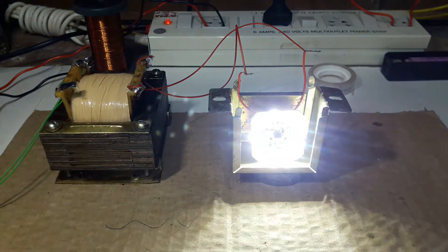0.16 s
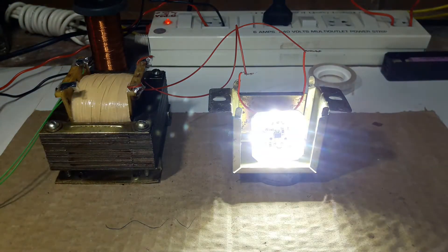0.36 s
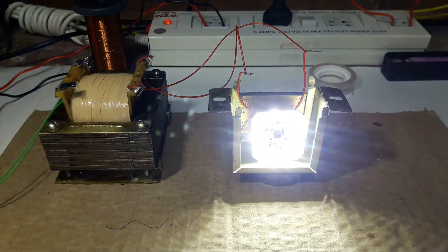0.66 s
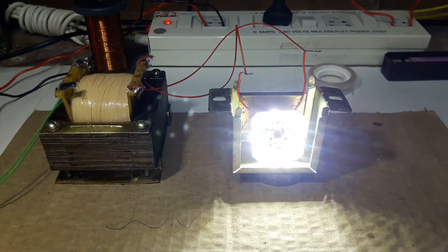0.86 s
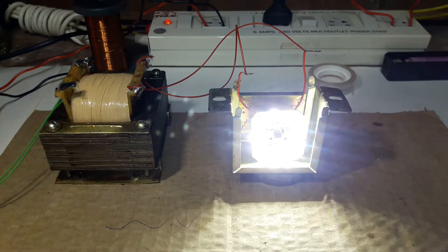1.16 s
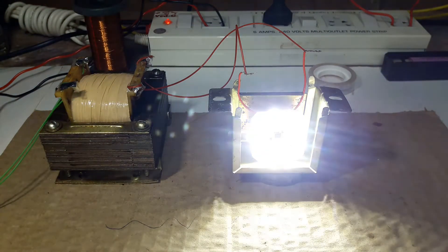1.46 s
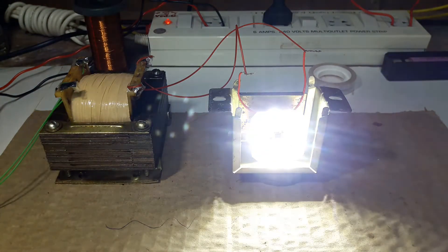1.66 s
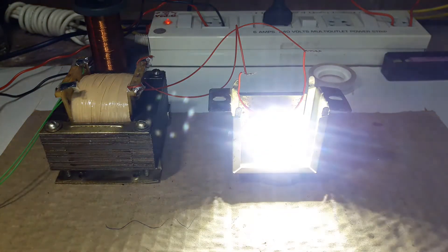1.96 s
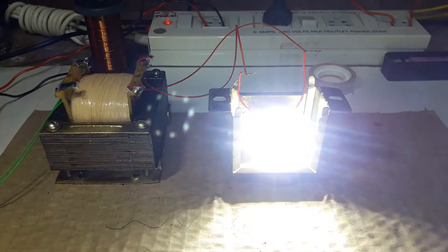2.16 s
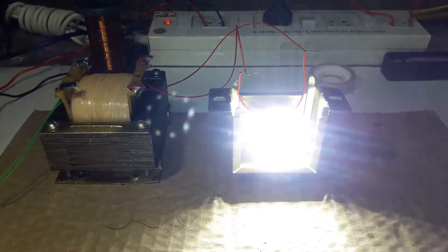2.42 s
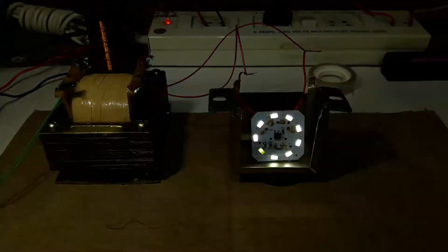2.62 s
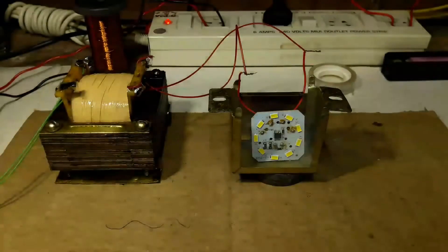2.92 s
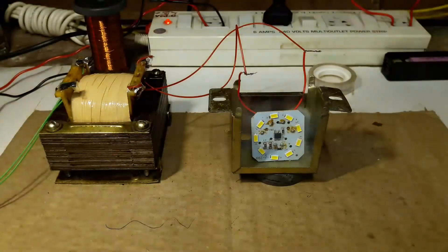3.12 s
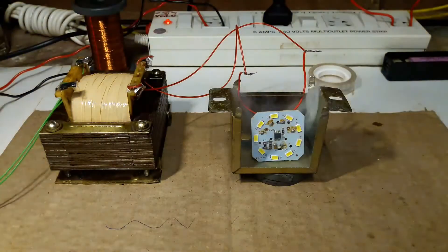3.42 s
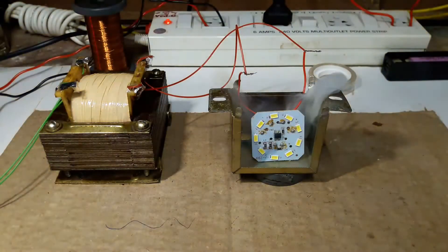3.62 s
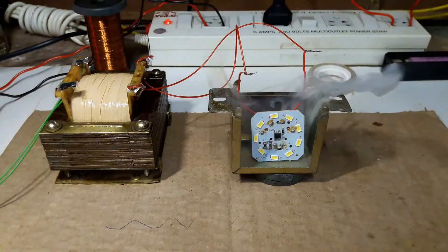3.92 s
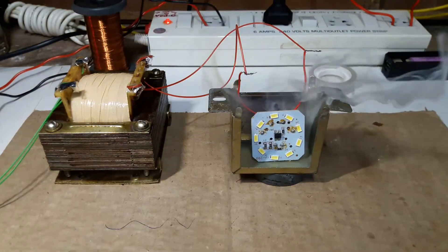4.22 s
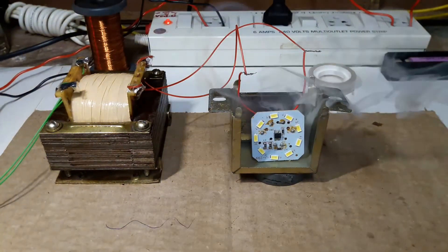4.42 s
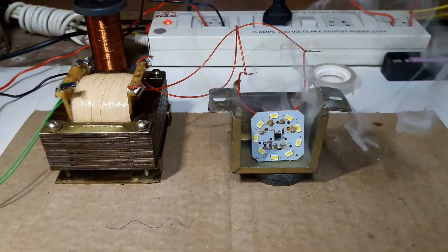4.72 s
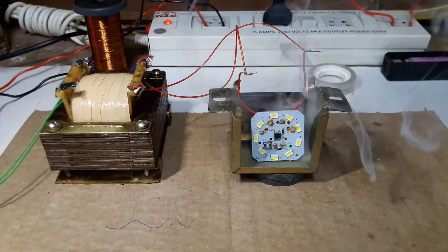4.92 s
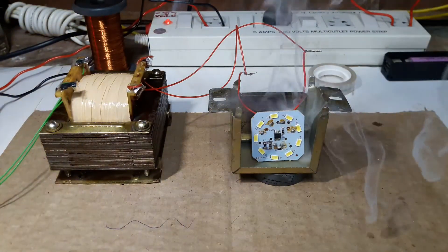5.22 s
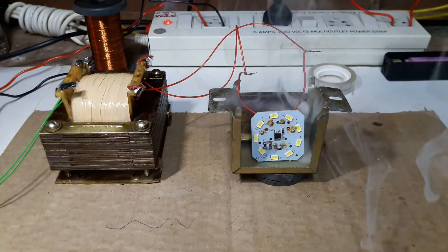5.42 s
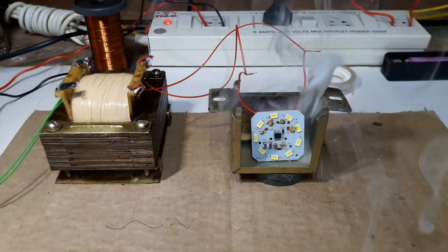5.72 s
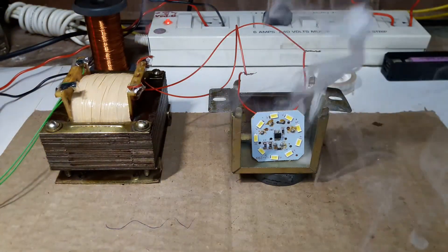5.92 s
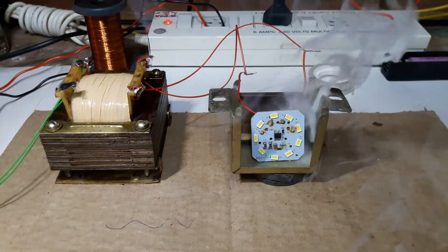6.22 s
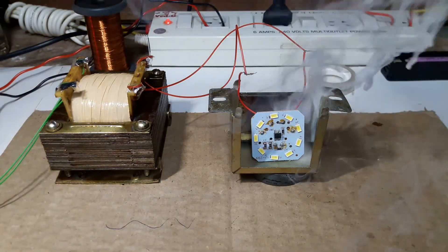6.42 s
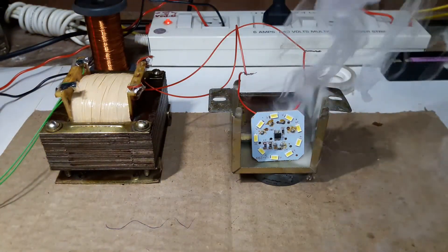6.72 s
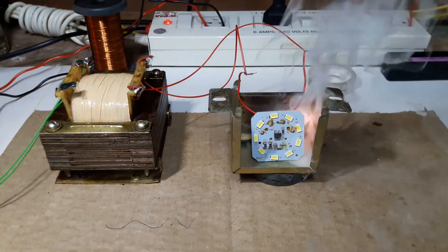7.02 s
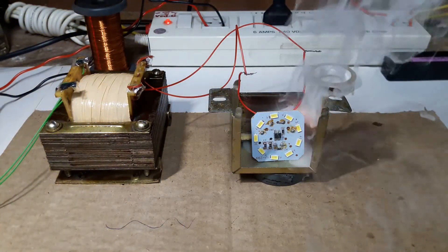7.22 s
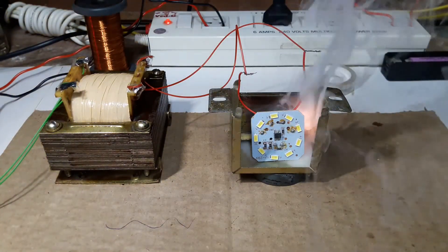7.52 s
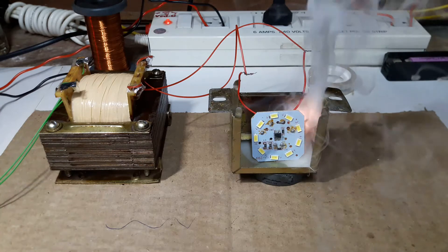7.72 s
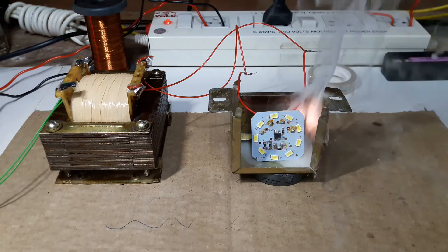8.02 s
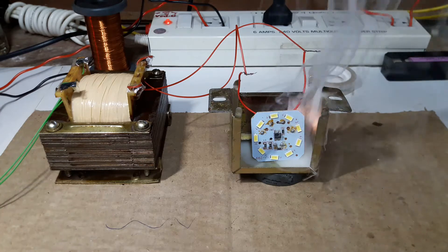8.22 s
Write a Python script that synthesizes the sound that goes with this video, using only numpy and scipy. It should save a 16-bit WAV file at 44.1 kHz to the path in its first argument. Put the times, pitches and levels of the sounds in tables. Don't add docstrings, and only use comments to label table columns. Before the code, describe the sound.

A faint background sinks almost to silence, then opens at 0.3 s into quiet room noise and steady transformer hum, with tiny electrical ticks. From about 1 s a lamp board's arc grows into a bright, rapid mains-rate sputter, sharp ticks at 1.3 to 1.9 s, strongest near 2.1 s, then thinning into a higher whistle. Cracks snap at 2.77 s, and at 2.9 s a huge, dry bang overloads the microphone, ringing briefly in the small room. The background ducks, and weak spitting resumes, recovering by 4.5 s. Hard snaps and fierce fizz cluster from 4.3 to 5.2 s with a thin gas whistle. A fuller buzzing hiss swells from 5.5 to 7.3 s, dips, then returns with sharp spits at 8.1 and 8.3 s. Faint soft hoots sound outside, notably near 2.6, 4.1 and 7.5 s. It ends still fizzing at 8.4 s.

```python
import sys
import numpy as np
from scipy import signal
from scipy.fft import rfft, irfft
from scipy.io import wavfile
from scipy.ndimage import uniform_filter1d

SR = 44100
rng = np.random.default_rng(int(sys.argv[2]) if len(sys.argv) > 2 else 0)


def bounce(signal):
    frames = np.transpose(np.atleast_2d(signal))
    limited = np.clip(frames, -1, 1)
    pcm = np.round(limited * 32767).astype(np.int16)
    wavfile.write(sys.argv[1], SR, pcm)


def undo_db(level):
    steps = np.asarray(level, float) / 20
    return 10 ** steps


N = 368676


def rms_one(x):
    return x / np.sqrt(np.mean(x ** 2) + 1e-20)


def in_time(rows):
    s, *columns = np.transpose(rows)
    return [np.interp(np.arange(N) / SR, s, column) for column in columns]


def at_hz(points, hz):
    points_hz, points_db = np.transpose(points)
    return np.interp(np.log(hz), np.log(points_hz), points_db)


def colour(x, spectrum, rings=()):
    size = 4096
    hz = np.arange(size // 2 + 1) * SR / size + 1
    db = at_hz(spectrum, hz)
    for ring_hz, width_hz, top_db in rings:
        db = db + top_db / (1 + (2 * (hz - ring_hz) / width_hz) ** 2)
    cepstrum = irfft(np.log(undo_db(db)))
    cepstrum[1:size // 2] *= 2
    response = irfft(np.exp(rfft(cepstrum[:size // 2], size)))[:size // 2]
    return signal.fftconvolve(x, response / np.linalg.norm(response))[:len(x)]


def crackle(per_s, spread_db):
    sizes = undo_db(spread_db * np.minimum(rng.exponential(1, N), 4))
    signs = rng.choice([-1, 1], N)
    happens = rng.random(N) < per_s / SR
    return rms_one(sizes * signs * happens)


MAINS_HZ, FIRST_STRIKE_S = 49.986, .0056
BURN_S, SAG_S, RISE_S = .0042, .03, .0009
PUFF_DB = 11
BANG_S = 2.9
# [t/s, peak level/dB, extra body/dB]
SPARKS = [(2.7683, -29, -12), (3.0268, -28, -1), (3.0865, -26.5, -0.5), (3.2766, -31.5, -2.5),
          (3.4067, -30.5, -4.5), (3.706, -28.5, -1.5), (3.8675, -27.5, -1.5), (4.1065, -27, 1),
          (4.2485, -25, -1), (4.3271, -22.5, 0.5), (4.3464, -20.5, -2.5), (4.428, -18.5, -4.5),
          (4.4467, -18.5, -3), (4.4674, -19, -2), (4.5272, -17, 1.5), (4.5665, -16.5, -4),
          (4.587, -15, -1.5), (4.6072, -14, -3.5), (4.7477, -24, 0), (4.807, -26.5, 1), (4.9072, -22.5, -6),
          (4.9275, -19, -3), (4.9673, -16.5, -5.5), (4.987, -22.5, -2), (5.1072, -17.5, -5),
          (5.167, -24.5, -9), (6.3694, -38, 5), (6.5064, -34.5, 1), (8.1287, -27.5, -1),
          (8.3285, -24, -4.5)]
# [t/s, peak level/dB, extra body/dB]
TICKS = [(0.3042, -54, 0), (0.3361, -52, 2), (0.417, -49, 0), (0.5965, -58, 0), (0.7292, -38, -9),
         (1.285, -28, -1), (1.346, -28.5, 1.5), (1.506, -23.5, -3), (1.646, -25, -3), (1.736, -26, -5),
         (1.763, -25, -1), (1.776, -22.5, 2), (1.7858, -23, -5), (1.8154, -26, -4), (1.8663, -26, -2),
         (2.8993, -7, 1.5), (2.9264, -18, -4), (2.9464, -18, -4), (2.9674, -29, 0), (3.0071, -28.5, 0)]
# [t/s, length/s, loss/dB]
LULLS = [(1.268, .03, 6), (3.06, 0.027, -4), (3.35, 0.11, 5), (3.974, 0.081, 3), (4.951, .03, 5),
         (5.015, 0.025, 0.5), (5.45, 0.076, 3), (5.79, 0.12, 4.5), (6.14, 0.18, 3.5), (7.386, 0.061, 2),
         (7.998, 0.12, 3.5), (8.218, 0.026, 2)]


def arc(table, voice, spectra, rings, uneven_db, own_db, leak_db, crest_db):
    t = np.arange(N) / SR
    begin_s, end_s = table[0][0], table[-1][0]
    heat_db, shift_db, weak_db = uniform_filter1d(in_time(table), size=SR // 25)
    for s, length, loss_db in LULLS:
        heat_db = heat_db - loss_db * np.exp(-(2 * (t - s) / length) ** 2)
    levels_db = [heat_db + offset_db + share * shift_db + drift_db * (t - begin_s)
                 for offset_db, share, drift_db in voice]

    lead_s = .003
    half_cycles = (t - FIRST_STRIKE_S + lead_s) * 2 * MAINS_HZ
    which = np.maximum(half_cycles, 0).astype(int)
    strength, late_s, *own = np.clip(rng.standard_normal((6, which[-1] + 1)), -1.7, 1.7)
    late_s = 0.0006 * late_s
    own = own_db * np.array(own)
    gain = undo_db(uneven_db * strength)[which] * undo_db(weak_db * (which % 2))
    usual = np.sqrt(uniform_filter1d(gain ** 2 * BURN_S * MAINS_HZ + undo_db(leak_db) ** 2, size=SR // 8))
    gain = gain / usual

    bright = np.hypot(undo_db(levels_db[0]), undo_db(levels_db[1]))
    for s, peak_db, body_db in SPARKS + TICKS:
        k = which[int(s * SR)]
        late_s[k] = s - RISE_S / 2 - FIRST_STRIKE_S - k / (2 * MAINS_HZ)
        own[:, k] = 0, 0, body_db, body_db
        gain[which == k] = undo_db(peak_db - crest_db) / bright[which == k]

    since_s = half_cycles % 1 / (2 * MAINS_HZ) - lead_s - late_s[which]
    flame = np.clip(since_s / RISE_S, 0, 1) * np.exp(-since_s / SAG_S - (since_s / BURN_S) ** 6)
    fizz = crackle(30000, 1.1)

    cycle = half_cycles % 2
    puff_db = PUFF_DB * np.clip(-weak_db / 8.0, 0, 1) * (.5 - cycle / 2 - (cycle < .3))
    hiss = undo_db(leak_db + puff_db) / usual * rng.standard_normal(N)

    near_bang = abs(t - BANG_S - .005) <= .012
    live = (t > begin_s) & (t < end_s + .003) & ~near_bang
    drive = live * (gain * flame * fizz + hiss)
    out = 0
    for level_db, own_k, spectrum in zip(levels_db, own, spectra):
        out = out + colour(drive * undo_db(level_db + own_k[which]), spectrum, rings)
    return out


# [t/s, strength level/dB, whistle climb/dB, weak half-cycle level/dB]
LIT = [
    (0.29, -106, 0, -3),
    (0.93, -91, -6, -3),
    (1.05, -74, -2, -12),
    (1.24, -65, -3, -12),
    (1.32, -55.5, -3, -8),
    (1.76, -52.5, 0, 6),
    (2.08, -48.5, 1.5, -1),
    (2.2, -52, 8, -5),
    (2.49, -66, 13, -1),
    (2.755, -72, -1, -4),
]
# [offset/dB, share of the climb, drift/(dB per s)]
LIT_VOICE = [
    (-1.5, 1.12, 0),
    (1.5, -0.72, 0.5),
    (-22, 0.63, 3),
    (-24.5, 1.05, 0.1),
]
# [f/Hz, level/dB per Hz]
TOP_LIT = [(8000, -32), (13600, -3.5), (14800, -3), (15700, -5)]
UPPER_LIT = [(4820, -68), (8200, -30), (10200, -14), (11000, -16), (11300, -6.5), (12300, 0.5), (12800, 2),
             (13600, -7.5)]
MIDDLE_LIT = [(2290, -46), (3900, -19), (4640, -11.5), (4960, -5.5), (5870, -4.5), (6520, 2), (7400, -2.5),
              (8000, -36), (10400, -61), (17600, -120)]
# [f/Hz, level/dB per Hz]
BOTTOM = [(530, -26), (900, -13), (1120, -0.5), (1470, -13), (1680, -4), (1810, -15.5), (2090, 3.5),
          (2350, -9.5), (2660, 4), (2820, -7.5), (3040, -4), (3260, -16), (3610, -8), (4100, -17.5),
          (5330, -44.5), (9020, -120)]
# [f/Hz, width/Hz, level/dB]
RINGS_LIT = [(4325, 78, 10), (4986, 77, 6), (12500, 290, 2), (14400, 300, 3.5), (15400, 340, 4.5),
             (13800, 300, -3)]


def shining_lamp():
    return arc(LIT, LIT_VOICE, (TOP_LIT, UPPER_LIT, MIDDLE_LIT, BOTTOM), RINGS_LIT,
               uneven_db=-0.5, own_db=2.5, leak_db=-12, crest_db=10.0)


# [t/s, heat level/dB, sharpness/dB, weak half-cycle level/dB]
BURNT = [(2.765, -55, -10, 0), (2.885, -65.5, 9, 10), (3.13, -69.5, 6.5, -4), (3.4, -60, 3.5, -5),
         (3.85, -60, 11, -8), (4.1, -59.5, 11, -14), (4.3, -54.5, 9, -9), (4.57, -46, 7.5, -11),
         (4.68, -56, 8, -5), (4.97, -49.5, 4, -10.5), (5.16, -48.5, 3, -2), (5.22, -57, 0, 1),
         (5.95, -49.5, -8, -10.5), (6.6, -47.5, -14.5, -16), (7.3, -50, -15, -13), (7.45, -58.5, -6, 6),
         (7.85, -52, 0, -6), (8.36, -53, 1, -1)]
# [offset/dB, share of the sharpness, drift/(dB per s)]
BURNT_VOICE = [
    (-0.5, 0.92, 0.5),
    (-6.5, 0.32, -0.11),
    (-1, 0.039, 0),
    (-8.5, 0.15, 1.1454),
]
# [f/Hz, level/dB per Hz]
TOP_BURNT = [(6650, -49), (11300, -8.5), (11900, -5.5), (12700, -3), (13700, -1.5), (14300, -0.5),
             (15200, -18), (15700, -11.5)]
UPPER_BURNT = [(4760, -38.5), (8100, -23), (8480, -7), (9570, -8), (9840, -6), (10300, 2.5), (11300, -9.5),
               (14700, -47), (22000, -120)]
MIDDLE = [(2350, -47), (4000, -18), (4360, -12), (4580, -17.5), (5460, -5.5), (6040, -6.5), (6680, -2.5),
          (7290, -3.5), (7660, -27), (8000, -20), (10400, -52), (17600, -120)]
# [f/Hz, width/Hz, level/dB]
RINGS_BURNT = [(5270, 45, 4), (4850, 50, 5), (5900, 83, 3.4), (6550, 620, 6.7), (8720, 140, 5.9),
               (13900, 300, 3.7), (15340, 500, 6)]


def burning_board():
    return arc(BURNT, BURNT_VOICE, (TOP_BURNT, UPPER_BURNT, MIDDLE, BOTTOM), RINGS_BURNT,
               uneven_db=0.75, own_db=2.2, leak_db=-17.5, crest_db=10.0)


# [t/s, level/dB]
BANG = [
    (2.9, 5.5),
    (2.9006, 6.5),
    (2.9024, -10.5),
    (2.9083, -8),
    (2.9185, -16.5),
]
# [f/Hz, level/dB per Hz]
BANG_COLOUR = [(29, -45), (50, -21.5), (155, -7), (362, -8.5), (572, 1.5), (783, -2), (1180, -3.5),
               (1780, -10), (2750, -2.5), (4450, -15), (6550, -6), (7950, -28.5), (9410, -15.5),
               (14200, -14.5), (16000, -26.5)]
# [f/Hz, time to fall 60 dB/s]
BANG_TAIL = [(60, 0.19), (160, 0.2), (420, 0.19), (1100, 0.22), (2910, 0.19), (7680, 0.18)]
# [f/Hz, width/Hz, level/dB]
BANG_RINGS = [(169, 98, 6.5), (307, 25, 11), (433, 43, 7), (694, 43, 3), (1170, 40, 4), (1030, 40, 5),
              (1577, 10, 6), (2256, 130, 8.5), (2700, 155, 5), (4360, 53, 10.5), (7150, 220, 3)]


def bang(pulse_s, tail_db):
    t = np.arange(int(.6 * SR)) / SR
    x = np.zeros(len(t))
    for s, db in BANG:
        u = (t - s + BANG[0][0]) / pulse_s
        x += undo_db(db) * (1 - 2 * u) * (u >= 0) * (u < 1)
    white = rng.standard_normal((2, len(t)))
    edges_hz = 40 * 2 ** np.arange(0, 8.8, .5)
    for k, (low, high) in enumerate(zip(edges_hz, edges_hz[1:])):
        band_filter = signal.butter(2, [low, high], "band", fs=SR, output="sos")
        band = signal.sosfilt(band_filter, white[k % 2])
        t60_s = at_hz(BANG_TAIL, np.sqrt(low * high))
        x += undo_db(tail_db - 60 * t / t60_s) * band
    thump = undo_db(-27) * np.sin(2 * np.pi * 95 * t) * np.exp(-t / 0.006)
    out = np.zeros(N)
    start = int(BANG[0][0] * SR)
    out[start:start + len(t)] = colour(x, BANG_COLOUR, BANG_RINGS) + thump
    return out


# [t/s, peak level/dB]
POPS = [
    (2.769, -21.5),
    (2.788, -29),
    (2.8167, -33),
    (3.0866, -32.5),
    (3.2777, -56.5),
    (3.407, -56),
]
# [f/Hz, level/dB per Hz]
POP_COLOUR = [(350, -36.5), (600, -1.5), (2120, -5.5), (2830, -5.5), (3480, -15.5), (7020, -7), (7940, -19),
              (13600, -8.5), (14700, -10), (16000, -7)]


def pops(decay_s):
    s, db = np.transpose(POPS)
    starts = np.zeros(N)
    starts[(s * SR).astype(int)] = undo_db(db)
    fading = signal.fftconvolve(starts, np.exp(-np.arange(600) / SR / decay_s))[:N]
    rattle = crackle(8000, 3.0) * fading
    return colour(undo_db(10.5) * starts + undo_db(-8) * rattle, POP_COLOUR)


# [start t/s, end t/s, level/dB]
WHISTLES = [
    (3.15, 3.4, -76),
    (4.6, 5.3, -65.5),
]
WHISTLE_HZ, WHISTLE_WIDTH_HZ, WHISTLE_SWELL_S = 5190, 100, .1


def whistle():
    t = np.arange(N) / SR
    r = np.exp(-np.pi * WHISTLE_WIDTH_HZ / SR)
    poles = [1, -2 * r * np.cos(2 * np.pi * WHISTLE_HZ / SR), r * r]
    once = signal.lfilter([1, 0, -1], poles, rng.standard_normal(N))
    tone = rms_one(signal.lfilter([1], poles, once))
    swell = 0
    for s, end, db in WHISTLES:
        swell = swell + undo_db(db) * np.clip(np.minimum(t - s, end - t) / WHISTLE_SWELL_S, 0, 1)
    return tone * swell


ROOM_T60_S = .24


def room(x, wet_db, echo_db):
    t = np.arange(int(.3 * SR)) / SR
    tail = rng.standard_normal(len(t)) * undo_db(-60 * t / ROOM_T60_S) * np.clip(t / 0.0054, 0, 1)
    echo = rng.standard_normal(len(t)) * np.exp(-((t - .0085) / 0.00044) ** 2)
    response = undo_db(wet_db) * tail / np.linalg.norm(tail) + undo_db(echo_db) * echo / np.linalg.norm(echo)
    response[0] = 1
    return signal.fftconvolve(x, response / np.linalg.norm(response))[:N]


# [t/s, length/s, f/Hz, level/dB]
HOOTS = [
    (1.14, 0.21, 1544, -68),
    (2.622, 0.21, 552, -54),
    (4.079, 0.32, 553, -62),
    (6.55, 0.3, 640, -72),
    (7.447, 0.1, 703, -57),
    (7.62, 0.22, 755, -58),
]


def hoots():
    t, out = np.arange(N) / SR, 0
    waver = np.cumsum(np.interp(t, np.arange(0, 9, .025), rng.standard_normal(360))) / SR
    for s, length, hz, db in HOOTS:
        swell = np.sin(np.pi * np.clip((t - s) / length, 0, 1))
        out = out + undo_db(db) * swell * np.sin(2 * np.pi * (hz * t + 9 * waver))
    return out


HUM_ORDERS = [2, 4, 6, 10, 13, 14, 15, 16, 17, 18, 20, 21, 22, 24]
HUM_DB = [-14.5, -9, -28.5, -5, -14, -14, -14.5, -9, -38, -18.5, -14.5, -21, -12, -17]


def transformer_hum():
    t, hum = np.arange(N) / SR, 0
    phases = rng.uniform(0, 2 * np.pi, len(HUM_DB))
    for order, db, phase in zip(HUM_ORDERS, HUM_DB, phases):
        hum = hum + undo_db(db + 3.0) * np.sin(2 * np.pi * order * MAINS_HZ * t + phase)
    return hum


# [t/s, level/dB]
FADE = [
    (0, -66),
    (.14, -72),
    (.23, -80),
    (.2845, -97),
    (.287, -58),
]
# [t/s, room level/dB]
GAIN = [(0.29, -58), (0.97, -58), (1.5, -55), (2.86, -54), (3.12, -62.5), (3.849, -72.5), (4.17, -65.5),
        (4.401, -58), (4.8, -54.5), (8.36, -54)]
# [f/Hz, level/dB per Hz]
ROOM_NOISE = [(26, -40), (45, -14.5), (100, -8), (170, -3), (440, -8.5), (800, -10.5), (1150, -13),
              (2350, -23.5), (7000, -40.5), (8050, -47), (9500, -41), (14500, -34), (16000, -48.5)]
OFFSET_FULL, OFFSET_FOLLOWS, OFFSET_FADE = -.0013, .5, (-.001, 0)


def background():
    t = np.arange(N) / SR
    level_db, = in_time(FADE + GAIN)
    common, apart = (colour(white, ROOM_NOISE) for white in rng.standard_normal((2, N)))
    fade_end_s = FADE[-1][0]
    offset_in_fade = np.interp(t, [0, fade_end_s], OFFSET_FADE)
    offset_after = OFFSET_FULL * undo_db(OFFSET_FOLLOWS * (level_db - level_db.max()))
    offset = uniform_filter1d(np.where(t < fade_end_s, offset_in_fade, offset_after), size=SR // 400)
    mid = undo_db(level_db) * (common + transformer_hum()) + offset
    return mid, undo_db(level_db - 14.5) * apart


def scene():
    board = room(shining_lamp() + burning_board() + pops(decay_s=.002), wet_db=-9.5, echo_db=-17.5)
    burst = bang(pulse_s=0.00055, tail_db=-10)
    mid, side = background()
    mid = mid + board + burst + whistle() + hoots()
    return np.array([mid + side, mid - side])


def band_limit(x):
    return signal.sosfilt(signal.butter(12, 16500, fs=SR, output="sos"), x)


def record(dry):
    cut = signal.sosfilt(signal.ellip(8, .5, 38, 15700, fs=SR, output="sos"), dry)
    clipped = np.clip(cut, -.94, .94)
    smooth = signal.sosfilt(signal.ellip(8, .2, 60, 16350, fs=SR, output="sos"), clipped)
    return band_limit(smooth)


dry = scene()
out = record(dry)
bounce(out)
```